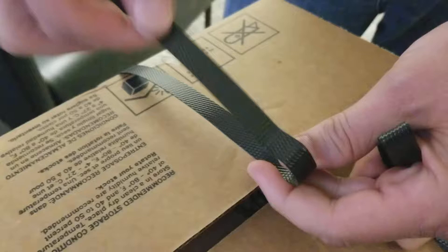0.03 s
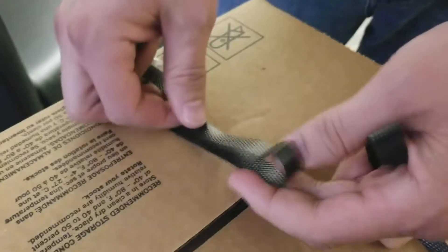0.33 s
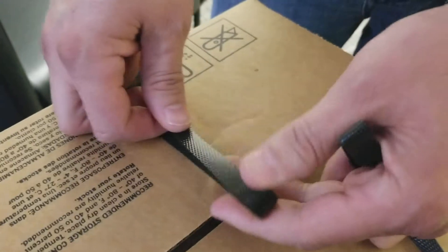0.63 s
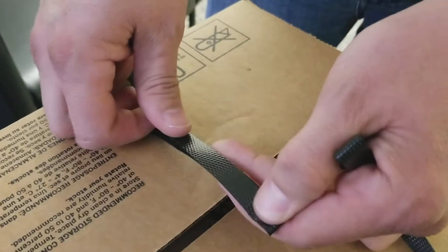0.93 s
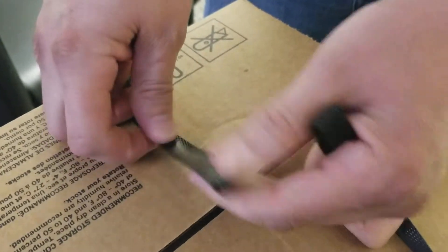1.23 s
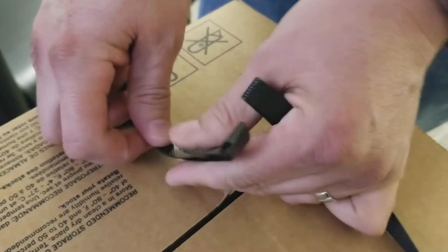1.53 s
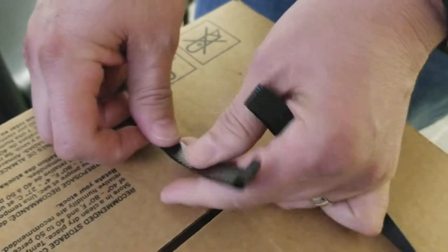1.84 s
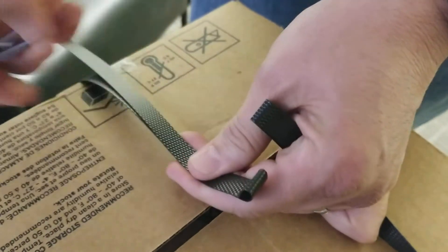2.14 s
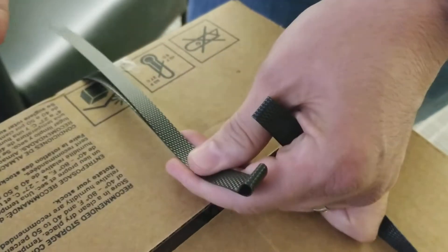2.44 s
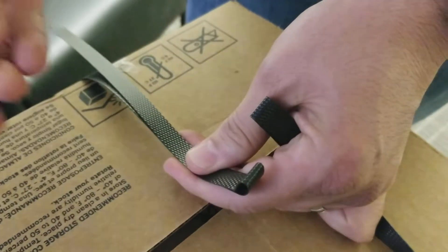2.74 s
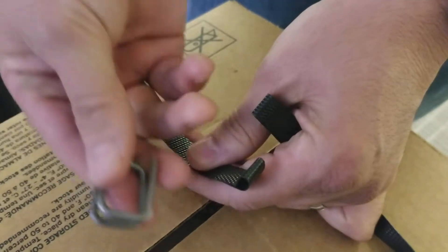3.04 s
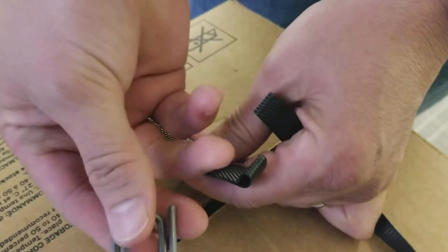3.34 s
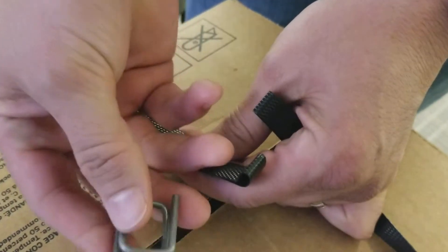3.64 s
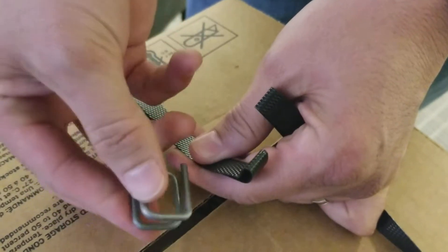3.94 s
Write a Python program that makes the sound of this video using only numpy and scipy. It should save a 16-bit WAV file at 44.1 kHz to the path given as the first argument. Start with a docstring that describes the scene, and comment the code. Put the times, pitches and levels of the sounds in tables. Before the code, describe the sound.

A ribbed plastic strap ticks and rubs close to the microphone as fingers fold it. It cracks and rasps, then snaps sharply, while hands bump a hollow cardboard box. A faint motor hum throbs in the quiet room.

```python
"""In a quiet room, the sound fades up on two motors of slightly different speed, throbbing over a faint rush of
air. Close by, fingers fold a ribbed plastic strap over a cardboard box; it ticks, rubs and swishes. After a
second it cracks, rasps and squeaks as it is drawn tight, and hands bump and slide on the box. Just after two
seconds the strap slips free with a sharp snap, and the hollow box is knocked again. The motors hum on through a
lull; a few light flicks and one last knock and rub come near the end."""
import sys
import numpy as np
from scipy import signal
from scipy.fft import rfft, irfft
from scipy.io import wavfile

SR = 44100
rng = np.random.default_rng(int(sys.argv[2]) if len(sys.argv) > 2 else 0)


def store_pcm(level_fs):
    """Save levels as 16-bit WAV."""
    pcm = np.round(np.clip(level_fs, -1, 1) * 32767).astype(np.int16)
    wavfile.write(sys.argv[1], SR, np.atleast_2d(pcm).T)


N = 176400
TIME = np.arange(N) / SR


def from_db(db):
    """Turn decibels into a number to multiply a sound by."""
    return 10 ** (np.asarray(db) / 20)


def rms_one(x):
    """Scale a signal so its average power is one."""
    return x / np.sqrt(np.mean(x ** 2) + 1e-20)


def per_frequency(points):
    """Join the dots of a (pitch_hz, value) table to get a value at every frequency."""
    hz, value = np.transpose(points)
    return np.interp(np.log(np.arange(N // 2 + 1) * SR / N + 1e-9), np.log(hz), value)


def drift(rate_hz):
    """A smooth random wobble, about one in size; a higher rate wobbles faster."""
    step, warm_up = 40, 2000
    memory = np.exp(-2 * np.pi * step * rate_hz / SR)
    noise = rng.standard_normal(N // step + warm_up + 2)
    slow = signal.lfilter([1], [1, -2 * memory, memory ** 2], noise)[warm_up:]
    return np.interp(np.arange(N) / step, np.arange(len(slow)), rms_one(slow))


def tone_filter(tone):
    """The short sound that one tap makes when shaped by a tone table."""
    cepstrum = irfft(np.log(from_db(per_frequency(tone))))
    cepstrum[1:] *= 2  # with the second half dropped, nothing sounds before the tap
    return irfft(np.exp(rfft(cepstrum[:N // 2], N)))[:1024]


def add(out, start_s, sound):
    """Mix a sound in at a given moment."""
    start = int(start_s * SR)
    out[start:start + len(sound)] += sound[:N - start]


def taps(rows, column):
    """One instant push for each row, at the level in the chosen column."""
    out = np.zeros(N)
    for row in rows:
        out[int(row[0] * SR)] += from_db(row[column])
    return out


def friction(rows, column, spread_db):
    """Surfaces stick and slip in tiny, uneven jerks; each stroke swells midway, then dies away."""
    attack_s, release_s = 0.0061, 0.0082
    slips_per_s, swell_db, grip_waver_db = 5000, 2.5, 2
    power = np.zeros(N)
    for row in rows:
        start, length_s = int(row[0] * SR), row[1]
        t = TIME[:N - start]
        arch = np.sin(np.pi * np.minimum(t / length_s, 1)) - .5
        envelope = np.clip(t / attack_s, 0, 1) * np.exp(-np.clip(t - length_s, 0, .5) / release_s)
        power[start:] += (from_db(row[column] + swell_db * arch) * envelope) ** 2
    sizes = from_db(spread_db * np.minimum(rng.exponential(1, N), 4)) * rng.choice([-1, 1], N)
    slips = sizes * (rng.random(N) < slips_per_s / SR)
    return np.sqrt(power) * rms_one(slips * from_db(grip_waver_db * drift(39)))


def echoes(decay_s, onset_s):
    """A wash of echoes, different in each ear, that falls about 60 dB in decay_s."""
    t = TIME[:SR // 2]
    decay = from_db(-60 * t / decay_s) * (1 - np.exp(-t / onset_s))
    wash = rng.standard_normal((2, len(t))) * decay
    for _ in range(8):  # even out the tone so no pitch sticks out
        even = irfft(np.exp(1j * np.angle(rfft(wash))), len(t))
        wash = even * np.minimum(1, 10 * decay / decay.max())
    return wash / np.linalg.norm(wash, axis=1, keepdims=True)


# How much louder the handling is in the left ear: pitch_hz, left_minus_right_db
EAR_BALANCE = [(250, .5), (900, 3.5), (1250, 7), (2000, 3), (2600, 6), (3700, 3), (5300, -4), (7500, 0),
               (9000, -1), (12500, 4), (15000, 9)]
def radiate(sound, near_db, room_db, tone=None):
    """Carry a sound to both ears: directly, off the nearby hands and box, and off the walls."""
    if tone is not None:
        body = tone_filter(tone)
        sound = signal.fftconvolve(sound, body / np.linalg.norm(body))[:N]
    right_delay_s = .00014
    near = from_db(near_db) * echoes(decay_s=0.024, onset_s=0.00026)
    near[0, 0] += 1  # the direct sound reaches the left ear first
    near[1, int(right_delay_s * SR)] += 1
    walls = from_db(room_db) * echoes(decay_s=0.23, onset_s=0.0081)
    path = near / np.sqrt(1 + from_db(near_db) ** 2) + walls
    ears = [tone_filter([(hz, side * db / 2) for hz, db in EAR_BALANCE]) for side in (1, -1)]
    path = signal.fftconvolve(path, ears, axes=1)
    return signal.fftconvolve(sound[None], path, axes=1)[:, :N]


# The hum at 1, 2 and 3 times each motor's pitch:
# slow_motor_db, fast_motor_db, throb_peak_s, left_minus_right_db
MOTOR_HARMONICS = [(-44, -48, 2.085, 1.3), (-49, -50, 2.14, 3.7), (-57, -66, 2.1, 3.7)]
def motors():
    """Two low hums move in and out of step, so together they throb."""
    pitches_hz, waver_db = (54.9, 58.83), 2
    out = 0
    for multiple, (slow_db, fast_db, peak_s, left_db) in enumerate(MOTOR_HARMONICS, 1):
        ears = from_db([[left_db / 2], [-left_db / 2]])
        for hz, db in zip(pitches_hz, (slow_db, fast_db)):
            hum = np.sqrt(2) * np.cos(2 * np.pi * multiple * hz * (TIME - peak_s))
            out = out + ears * from_db(db + waver_db * drift(2.74)) * hum
    return out


# The tone of the moving air: pitch_hz, relative_db
AIR_TONE = [(20, -8), (40, 4.5), (62, -2), (82, 2), (105, -5), (150, -1), (200, -10), (290, -11),
            (400, -18), (600, -31), (1300, -37), (2200, -33.5), (3900, -46), (9000, -47), (15500, -44)]
# How alike the air sounds in both ears: pitch_hz, likeness_0_to_1
AIR_LIKENESS = [(30, 0.92), (250, 0.92), (600, 0.59), (1500, 0.022), (15000, 0.042)]
def air():
    """Ventilation rumbles alike in both ears, under a wide, faint hiss."""
    middle, side = rfft(rng.standard_normal((2, N)))
    alike = per_frequency(AIR_LIKENESS)
    both = np.sqrt(1 + alike) * middle + np.sqrt(1 - alike) * side * [[1], [-1]]
    return from_db(-51) * rms_one(irfft(both * from_db(per_frequency(AIR_TONE))))


# The strap catches or creases; the loud cluster near 2.1 s is the snap:
# start_s, tick_relative_db, clack_level_db
STRAP_CLICKS = [(.174, -46, -50), (.8524, -29, -46), (.9113, -40, -50), (1.0712, -25, -17),
                (1.2732, -21, -27), (1.3806, -29, -29), (1.419, -48, -28), (1.4512, -38, -29),
                (1.6852, -35, -32), (1.7351, -29, -39), (1.7408, -27, -38), (1.7699, -28, -34),
                (1.789, -29, -32), (1.7974, -32, -32), (2.0297, -27, -18), (2.091, -19, -38),
                (2.0935, -11, -20), (2.0989, -14, -22), (2.1016, -5, -17), (2.1154, -20, -25),
                (2.1243, -30, -19), (3.777, -36, -26)]
# The bright tone of a tick: pitch_hz, relative_db
TICK_TONE = [(1500, -16), (3500, -10), (4500, -6), (6200, 0), (7700, 1), (9000, -5), (10800, -4),
             (12500, -1), (15000, -3), (16500, -6)]
# The duller tone of the bending strap, for clacks and scrapes: pitch_hz, relative_db
STRAP_TONE = [(250, -15), (460, 1), (650, -9), (860, 0), (1030, -1), (1270, 3.5), (1680, -3), (2400, -9.5),
              (3300, -12.5), (4300, -17), (9000, -33)]
def clicks():
    """Each catch gives a crisp tick from the ribs and a dull clack from the bending strap."""
    ticks = from_db(-1.5) * taps(STRAP_CLICKS, column=1)
    clacks = taps(STRAP_CLICKS, column=2)
    return (radiate(ticks, near_db=-3, room_db=-20.5, tone=TICK_TONE)
            + radiate(clacks, near_db=2.5, room_db=-9.5, tone=STRAP_TONE))


# A single rib slips past a fingertip: start_s, level_db, pitch_hz
RIB_FLICKS = [(.174, -40, 7200), (.389, -39, 8000), (.41, -39, 7000), (.6145, -39, 7700),
              (.7008, -43, 7400), (1.4512, -33, 7000), (1.6114, -35, 7400), (1.685, -30, 7700),
              (2.0292, -19, 7100), (2.1243, -25, 7700), (3.2778, -33, 7500), (3.2892, -31, 7700),
              (3.3052, -34, 7600)]
def flicks():
    """Each rib rings for an instant with a high note, set by the grip, and a softer, lower one."""
    decay_s, low_ratio, low_db = .0025, .7, -7
    out, t = np.zeros(N), TIME[:SR // 20]
    for start_s, db, hz in RIB_FLICKS:
        phase = 2 * np.pi * hz * t
        notes = np.sin(phase) + from_db(low_db) * np.sin(low_ratio * phase)
        ring = notes * from_db(-60 * t / decay_s)
        add(out, start_s, from_db(db) * ring / np.linalg.norm(ring))
    return radiate(out, near_db=-2.5, room_db=-8.5)


# The strap slides under the fingers: start_s, length_s, hiss_relative_db, scrape_db, box_rumble_db
STRAP_RUBS = [(.26, 0.06, -67, -66.5, -61.5), (.32, 0.055, -66.5, -78, -62),
              (.385, 0.026, -61, -74.5, -61.5), (.6, 0.05, -62, -71.5, -68),
              (.85, 0.066, -60.5, -72.5, -90), (1.012, 0.017, -57.5, -71, -66),
              (1.07, 0.041, -49.5, -58, -56), (1.122, 0.03, -41, -41, -46.5),
              (1.262, 0.03, -53, -50, -48.5), (1.286, 0.053, -57, -62.5, -59.5),
              (1.345, 0.22, -69.5, -74, -55.5), (1.449, 0.062, -52, -61, -41),
              (1.508, 0.046, -48.5, -70, -39), (1.565, 0.078, -66, -67, -52.5),
              (1.68, 0.013, -55.5, -53.5, -51), (1.731, 0.018, -51, -57, -57),
              (1.77, 0.042, -53.5, -57.5, -51.5), (1.845, 0.1, -65, -70, -65.5),
              (2.024, 0.063, -53, -57.5, -56), (2.089, 0.0046, -27, -41.5, -30.5),
              (2.106, 0.027, -62, -59, -36), (3.776, 0.035, -52, -61.5, -45),
              (3.801, 0.055, -66, -66, -50.5)]
# The tone of the ribs' hiss: pitch_hz, relative_db
RIB_TONE = [(1500, -20), (3000, -10), (4300, -7), (5500, -2), (6800, 0), (7800, 3), (8900, -6), (10500, -6),
            (12600, -3), (14500, -5), (16000, -9)]
def rubbing():
    """As the strap slides, its ribs hiss, its body scrapes and the box under it rumbles."""
    hiss = from_db(-5) * friction(STRAP_RUBS, column=2, spread_db=6.5)
    scrape = friction(STRAP_RUBS, column=3, spread_db=-0.5)
    shaking = friction(STRAP_RUBS, column=4, spread_db=-0.5)
    rumble = signal.fftconvolve(shaking, box_ring(pitch_ratio=1))[:N]
    return (radiate(hiss, near_db=15.5, room_db=-15, tone=RIB_TONE)
            + radiate(scrape, near_db=2.5, room_db=-9.5, tone=STRAP_TONE)
            + radiate(rumble, near_db=-25, room_db=-18))


# The notes the box rings with: pitch_hz, relative_db, decay_s (time to fall 60 dB)
BOX_NOTES = [(221, -1, 0.041), (272, 7.5, 0.08), (303, 1.5, 0.075), (412, -2, 0.085), (465, -7, 0.064),
             (800, -12, 0.042)]
def box_ring(pitch_ratio):
    """The hollow box rings briefly with several notes; a pressing hand shifts their pitch."""
    t = TIME[:SR // 3]
    ring = 0
    for k, (hz, db, decay_s) in enumerate(BOX_NOTES):
        note = (-1) ** k * np.sin(2 * np.pi * hz * pitch_ratio * t)  # every other note is flipped
        ring = ring + from_db(db - 60 * t / decay_s) * note
    return ring / np.linalg.norm(ring)


# Light strokes along the strap: start_s, length_s, level_db
SWISHES = [(.26, 1.77, -77), (.265, 0.08, -71), (.525, 0.084, -75), (1.47, 0.1, -66.5), (1.99, 0.05, -59.5),
           (3.277, 0.019, -62), (3.785, 0.19, -80)]
# Their high, airy tone: pitch_hz, relative_db
SWISH_TONE = [(4200, -12.5), (5400, -5.5), (6100, -7.5), (7700, 2.5), (9300, -11), (15000, -15)]
def swishes():
    """The strap runs lightly through the fingers with a soft swish."""
    strokes = friction(SWISHES, column=2, spread_db=3.5)
    return radiate(strokes, near_db=9, room_db=-17, tone=SWISH_TONE)


# The strap buckles with a hard crack: start_s, level_db
STRAP_CRACKS = [(.602, -37), (1.0712, -17)]
# The strap is dragged hard against itself: start_s, length_s, level_db
STRAP_RASPS = [(1.074, 0.088, -52), (1.124, 0.028, -43.5), (1.452, 0.106, -57.5), (3.775, 0.052, -68),
               (3.978, 0.025, -75)]
# The harsh tone of the strained plastic: pitch_hz, relative_db
STRAIN_TONE = [(500, -16), (1150, -2), (1700, -3), (2250, 1.5), (2550, -1), (3400, -2), (4200, -14),
               (9000, -22)]
def straining():
    """Under strain the strap cracks as it buckles, rasps against itself and squeaks."""
    cracks = taps(STRAP_CRACKS, column=1)
    rasps = friction(STRAP_RASPS, column=2, spread_db=1)
    return radiate(cracks + rasps + squeak(), near_db=1, room_db=-13.5, tone=STRAIN_TONE)


# A hand bumps the box: start_s, level_db, pitch_ratio
BOX_KNOCKS = [(1.072, -8, .93), (1.451, -8, 1.0), (2.029, -17, .97), (2.104, -9, 1.0), (2.1235, -6, 1.0),
              (3.7745, -6, 1.04)]
def knocks():
    """Each bump sets the box ringing with a hollow thud."""
    out = np.zeros(N)
    for start_s, db, pitch_ratio in BOX_KNOCKS:
        add(out, start_s, from_db(db) * box_ring(pitch_ratio))
    return radiate(out, near_db=-25, room_db=-18)


# The strap's one squeak: start_s, length_s, relative_db, start_pitch_hz, end_pitch_hz
STRAP_SQUEAK = (1.078, .05, -54, 3250, 3700)
def squeak():
    """A rough note that rises as the strap is drawn tight."""
    start_s, length_s, db, start_hz, end_hz = STRAP_SQUEAK
    progress = np.clip((TIME - start_s) / length_s, 0, 1)
    phase = 2 * np.pi * np.cumsum(start_hz + (end_hz - start_hz) * progress) / SR
    rough_note = drift(150) * np.cos(phase) + drift(150) * np.sin(phase)
    return from_db(db) * np.sin(np.pi * progress) * rough_note


# A hand slides along the box: start_s, length_s, level_db
HAND_SLIDES = [(1.33, 0.087, -58.5), (1.452, 0.11, -48), (1.56, 0.14, -59.5)]
# The tone of rubbed cardboard: pitch_hz, relative_db
CARDBOARD_TONE = [(300, -1), (650, -4.5), (780, -2), (860, 3), (960, 2.5), (1200, -29.5), (1950, -11.5),
                  (3000, -16.5), (8000, -37)]
def hand_slides():
    """Skin dragging over cardboard gives a hollow rush."""
    strokes = friction(HAND_SLIDES, column=2, spread_db=4)
    return radiate(strokes, near_db=-8, room_db=-5, tone=CARDBOARD_TONE)


def scene():
    """The background fades in, and the strap and box are handled over it."""
    silent_s, fade_s, fade_from_db = .1, 0.55, -15.5
    switch_on = np.clip((TIME - silent_s) / 0.0083, 0, 1)
    fade_in = from_db(fade_from_db * np.clip(1 - (TIME - silent_s) / fade_s, 0, 1))
    background = switch_on * fade_in * (motors() + air())
    return (background + clicks() + flicks() + rubbing() + swishes()
            + straining() + knocks() + hand_slides())


def record(dry):
    """Cut off the very highest treble steeply."""
    cutoff_hz = 16000
    return signal.sosfilt(signal.ellip(10, .1, 90, cutoff_hz, fs=SR, output="sos"), dry)


dry = scene()
out = record(dry)
store_pcm(out)
```